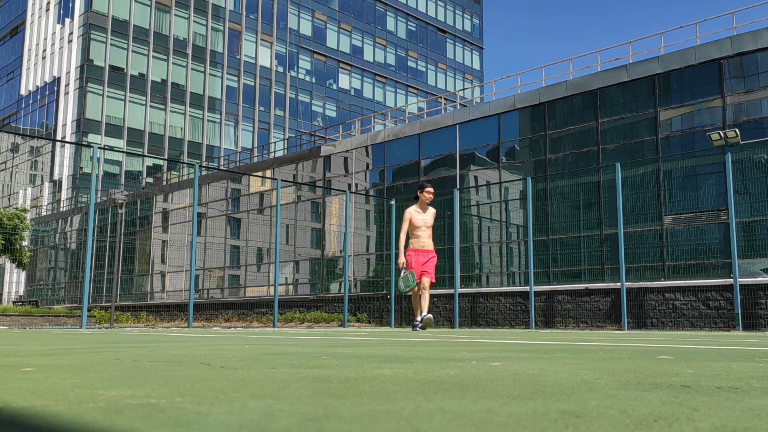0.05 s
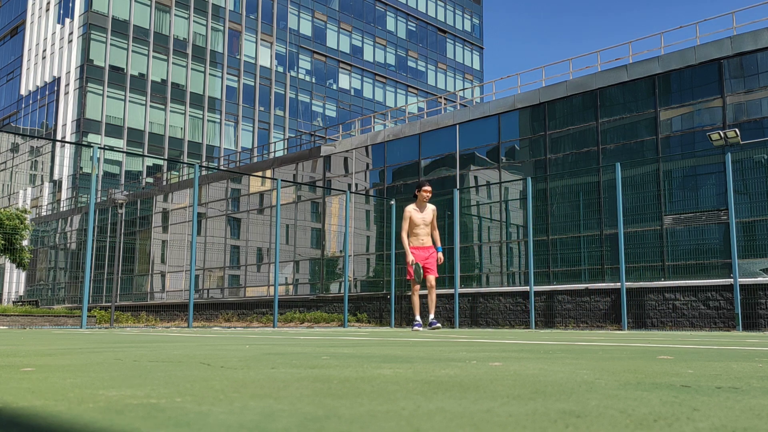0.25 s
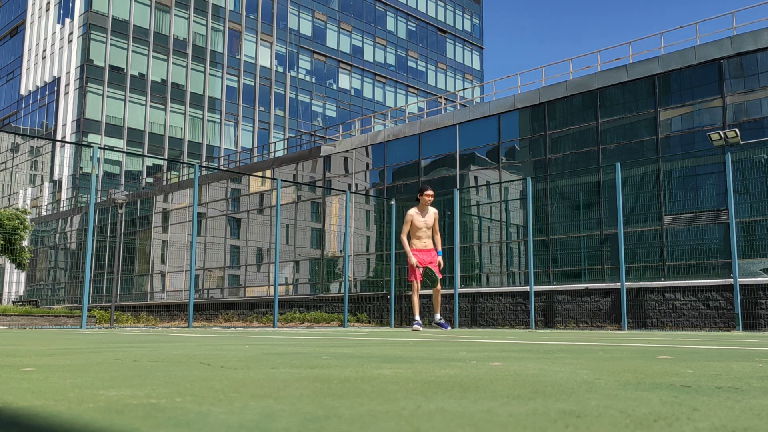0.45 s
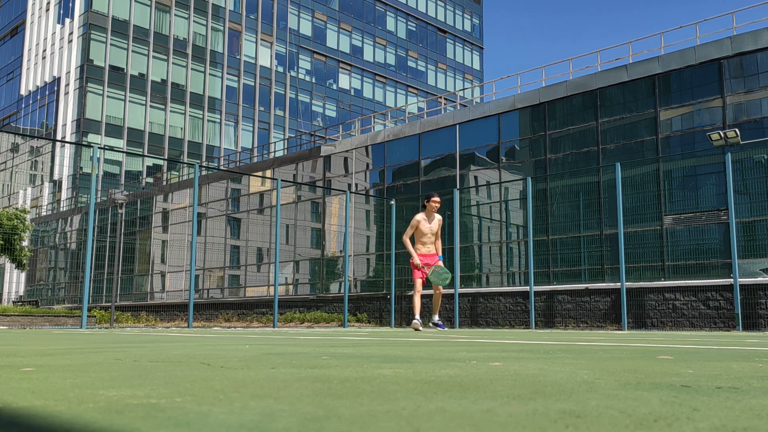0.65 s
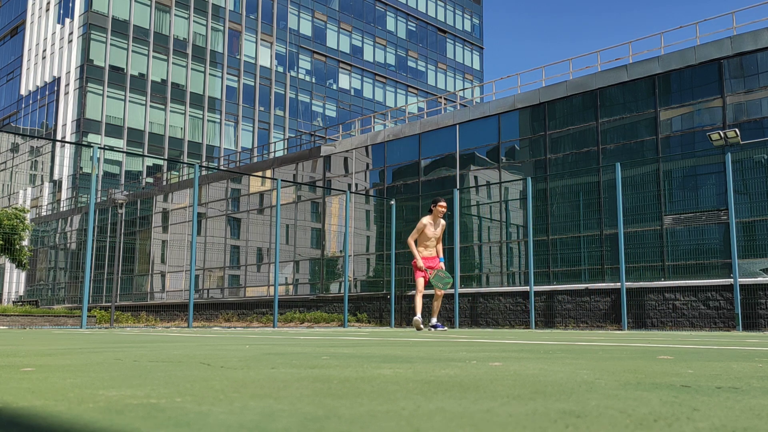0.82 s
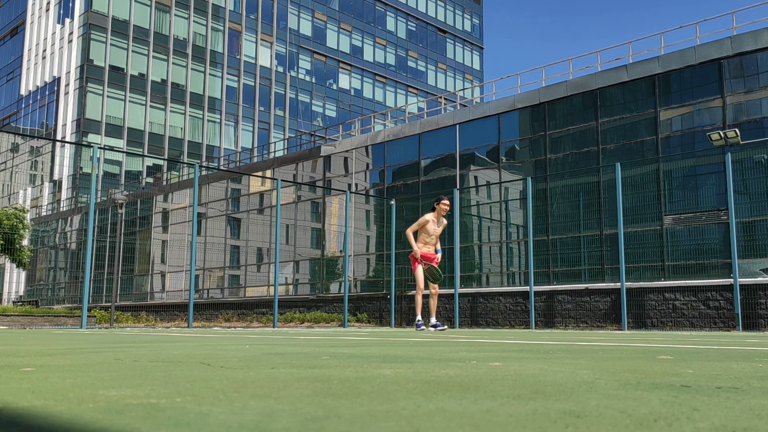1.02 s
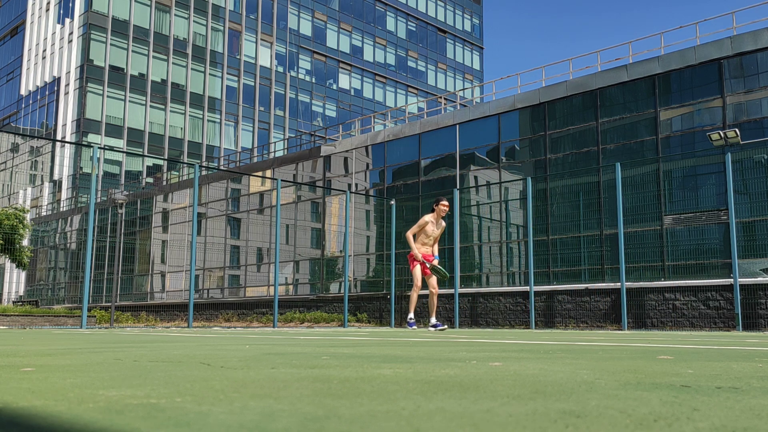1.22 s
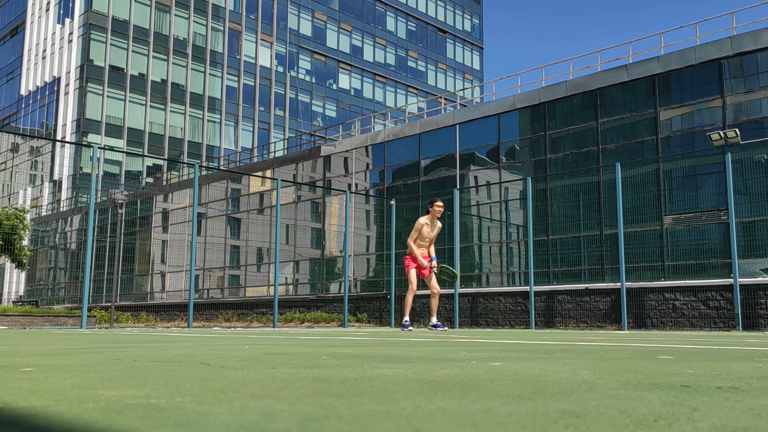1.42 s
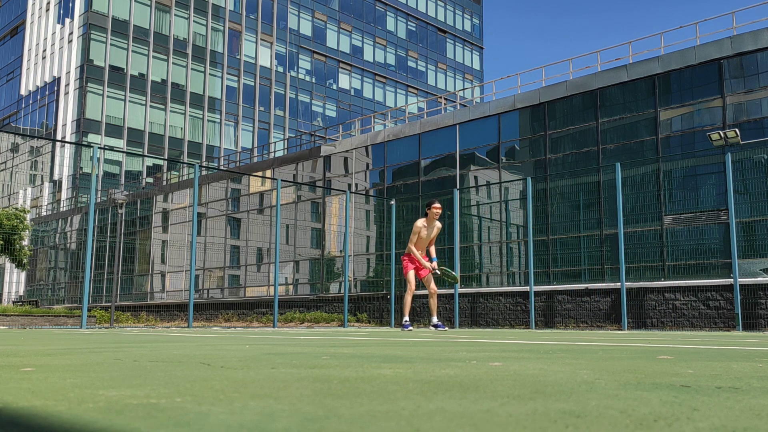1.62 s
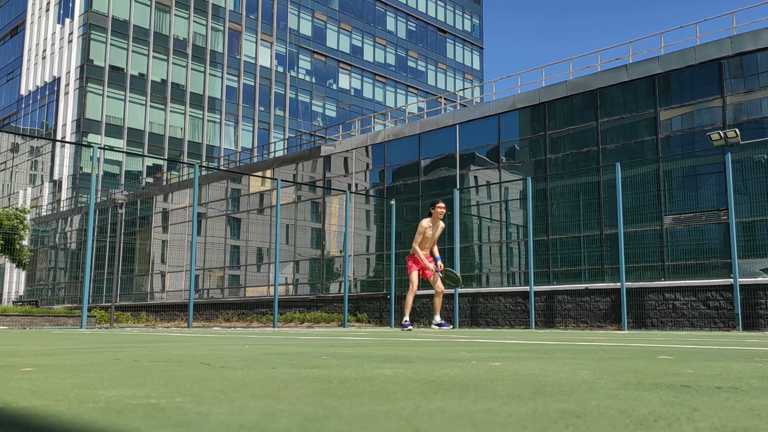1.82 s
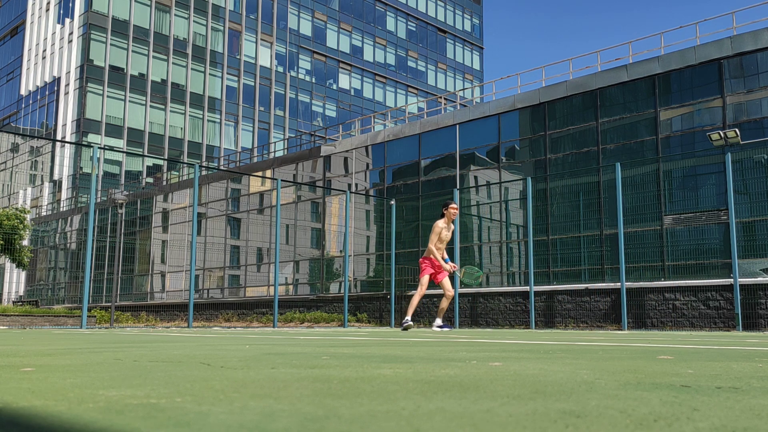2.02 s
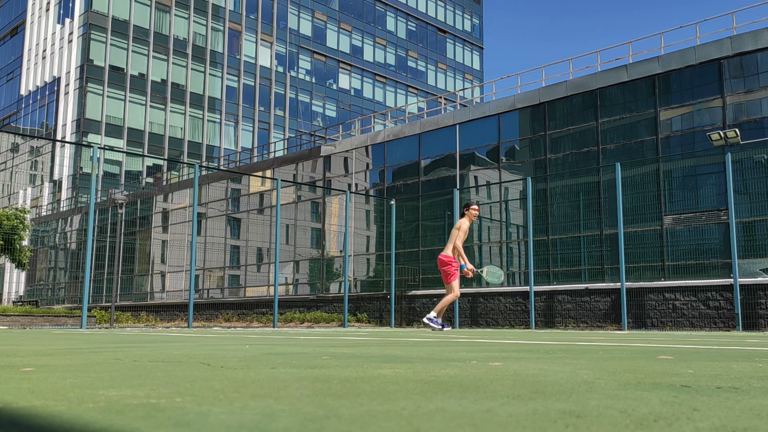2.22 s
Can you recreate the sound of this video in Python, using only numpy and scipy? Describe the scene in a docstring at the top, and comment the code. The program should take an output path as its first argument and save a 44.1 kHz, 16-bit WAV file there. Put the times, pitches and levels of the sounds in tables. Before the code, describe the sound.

One sharp paddle strike on a ball echoes across an outdoor court, with low wind rumble.

```python
"""A paddle game on a fenced outdoor court, heard from ground level through two microphone ports.
Traffic and machinery hum throughout, while wind buffets the ports in turn and soles brush the court.
From 0.9 s small ticks sound close by, and a distant stroke arrives as a soft splash of echoes.
Near 1.3 s an eddy flutters across the left port. At 1.6 s the ball cracks and rings close by,
and the walls answer with slaps, two hollow thuds and a grainy wash that dies into the traffic."""
import sys
import numpy as np
from scipy import signal
from scipy.fft import rfft, irfft
from scipy.io import wavfile
from scipy.ndimage import uniform_filter1d

SR = 44100
rng = np.random.default_rng(int(sys.argv[2]) if len(sys.argv) > 2 else 0)


def unload_audio(sound):
    """Save the sound as a 16-bit wav file, at the path given as the first command line argument."""
    columns = np.transpose(np.atleast_2d(sound))
    # keep every value between -1 and 1, then stretch to whole-number steps
    steps = np.round(np.clip(columns, -1, 1) * 32767)
    wavfile.write(sys.argv[1], SR, steps.astype(np.int16))


N = 103635
T = np.arange(N) / SR
HZ = np.fft.rfftfreq(N, 1 / SR)
IMPULSE = 1. * (T == 0)


def amp(db):
    """Decibels to gain."""
    return 10 ** (np.asarray(db) / 20)


def panned(db, pan_db):
    """Gains for the two ports, the left pan_db above the right."""
    return amp([[db + pan_db / 2], [db - pan_db / 2]])


def unit(x):
    """Scales to rms 1."""
    return x / np.sqrt(np.mean(x ** 2) + 1e-20)


def read(points, hz):
    """Reads a curve on a log-frequency axis."""
    f, value = np.transpose(points)
    return np.interp(np.log(hz + 1), np.log(f + 1), value)


def add(mix, s, sound):
    """Mixes a sound in at time s."""
    part = mix[..., round(s * SR):][..., :sound.shape[-1]]
    part += sound[..., :part.shape[-1]]


def noise(db, channels=2):
    """Noise with a given density (dB per Hz)."""
    return irfft(rfft(rng.standard_normal((channels, N))) * amp(db), N) * np.sqrt(SR / 2)


def colour(x, points, tilt=0, size=2048):
    """Minimum-phase EQ; tilt (dB per octave) tips the treble around 3 kHz."""
    hz = np.fft.rfftfreq(size, 1 / SR)
    octaves = np.log2(np.maximum(hz, 1000) / 3000)
    log_gain = np.log(amp(read(points, hz) + tilt * octaves))
    mirrored = np.concatenate([log_gain, log_gain[-2:0:-1]])
    taps = np.fft.ifft(np.exp(np.conj(signal.hilbert(mirrored)))).real
    return signal.fftconvolve(x, taps[None] if x.ndim > 1 else taps)[..., :x.shape[-1]]


def burst(t60, swell=0):
    """Dense reflections of energy 1 at each port, swelling and then dying."""
    attack = np.minimum((T + 1 / SR) / (swell + 1 / SR), 1)
    decay = amp(-60 * np.maximum(T - swell, 0) / t60)
    x = rng.standard_normal((2, N)) * attack * decay
    return x / np.linalg.norm(x, axis=1, keepdims=True)


# Bed of traffic and air (frequency [Hz], density [dB per Hz])
TRAFFIC_SPECTRUM = [(20, -56.5), (120, -72.5), (300, -77.5), (400, -81), (700, -82.5), (1150, -83.5),
                    (1600, -92.5), (2500, -99), (4000, -110), (6000, -116), (9500, -122), (13000, -117),
                    (16000, -118)]
# Stereo image of the bed (frequency [Hz], correlation of the ports [-1..1])
TRAFFIC_IMAGE = [(50, 0.88), (250, 0.84), (600, 0.26), (1100, -0.24), (2000, 0.084), (8000, -0.24)]
# Slow swell of the traffic (time [s], level [dB])
TRAFFIC_SWELL = [(0, 0), (.5, -1), (.9, -.5), (1.25, 0.8), (1.8, 0), (2.35, 0.9)]
# Machinery tones (frequency [Hz], width [Hz], level [dB])
HUM_TONES = [(249.5, 10, -61.5), (315.3, 36, -59), (500.2, 6, -68), (1240, 2.1, -70)]


def city(pan_db=0.2):
    """Far traffic, centred in the bass and wide above, with the faint hum of building machinery."""
    left, unrelated = rfft(noise(read(TRAFFIC_SPECTRUM, HZ)))
    correlation = read(TRAFFIC_IMAGE, HZ)
    right = correlation * left + np.sqrt(1 - correlation ** 2) * unrelated
    roar = irfft(np.array([left, right]), N)
    swell = amp(np.interp(T, *np.transpose(TRAFFIC_SWELL)))
    hum = 0
    for hz, width, db in HUM_TONES:
        peak_db = -20 * np.log10(1 + (2 * (HZ - hz) / width) ** 2)
        hum += amp(db) * unit(noise(peak_db, channels=1))
    return roar * swell * panned(0, pan_db) + hum


# Wind rumble (frequency [Hz], relative level [dB])
WIND_SPECTRUM = [(8, 1.5), (30, 4), (80, -1.5), (150, -9.5), (300, -32), (600, -43.5), (1500, -79)]
# Gust envelope at each port (time [s], level [dB])
GUSTS_LEFT = [(0, -70), (.27, -39.5), (.42, -45.5), (.68, -56), (.8, -40), (.98, -47), (1.12, -26),
              (1.22, -32.5), (1.35, -26), (1.44, -48.5), (1.52, -33.5), (1.7, -52), (1.9, -53), (2.35, -45)]
GUSTS_RIGHT = [(0, -42.5), (.14, -39.5), (.32, -31.5), (0.531, -38.5), (.6, -29.5), (.8, -28.5),
               (1.06, -26), (1.198, -41), (1.38, -31), (1.52, -49.5), (1.62, -42), (1.69, -31), (1.83, -28),
               (1.922, -54), (2.062, -33), (2.15, -52), (2.35, -47)]


def wind(skew=0.3):
    """Lopsided turbulence, unrelated at the two ports."""
    flow = unit(noise(read(WIND_SPECTRUM, HZ)))
    lopsided = unit(flow + skew * (np.sqrt(1 + flow ** 2) - np.sqrt(2)))
    return lopsided * amp([np.interp(T, *np.transpose(port)) for port in (GUSTS_LEFT, GUSTS_RIGHT)])


# Single wind pops (time [s], bump level [dB], half width [s], port [0 left, 1 right])
WIND_POPS = [(.21, -17, 0.0022, 1), (0.368, -17, 0.0079, 1), (.6, -19, 0.0054, 1), (.589, -27, 0.00097, 1),
             (0.668, -21.5, 0.0018, 1), (0.674, -16, 0.0027, 1), (0.7258, -14, 0.0025, 1),
             (0.7574, -11.5, 0.0061, 1), (0.818, -14, 0.0018, 1), (.834, -14.5, 0.0013, 1),
             (0.861, -11, 0.0024, 1), (0.9065, -10.5, 0.0013, 1), (.936, -22.5, 0.0011, 1),
             (.987, -22.5, 0.0013, 1), (1.0, -24, 0.0019, 1), (1.047, -22.5, 0.00152, 1),
             (1.055, -23.5, .001, 1), (1.064, -17, 0.0016, 1), (1.514, -20, 0.0022, 0),
             (1.715, -18.5, 0.002, 1), (1.816, -19.5, 0.0026, 1), (1.833, -26, 0.0012, 1),
             (2.06, -20.5, 0.0041, 1)]


def buffets(suction=0.26, spread=3.3, front=0.75):
    """Each buffet is a steep-fronted pressure bump inside a wider suction, on one port only."""
    out = np.zeros((2, N))
    for s, db, half, port in WIND_POPS:
        u = (T - s) / half
        bump = np.exp(-np.where(u < 0, u / front, u) ** 2)
        out[int(port)] += amp(db) * (bump - suction * np.exp(-(u / spread) ** 2))
    return out


def eddy(peak_s=1.3165, peak_hz=64.2, octaves_per_s=24.9, flutter_db=-11.5, churn_db=-24, churn_hz=220):
    """A strong eddy flutters faster and faster across the left port and breaks into churning air."""
    t = np.clip(T - peak_s, -.15, .15)
    turns = peak_hz * (2 ** (octaves_per_s * t) - 1) / (octaves_per_s * np.log(2))
    flutter = np.cos(2 * np.pi * turns) + 0.27 * np.cos(4 * np.pi * turns)  # the octave sharpens crests
    flutter *= np.exp(-(t / np.where(t < 0, 0.02, 0.028)) ** 2)  # quick build, slower fade
    churn = unit(noise(-20 * np.log10(1 + (HZ / churn_hz) ** 4), channels=1))[0]
    churn *= np.exp(-((t - 0.012) / 0.013) ** 2)  # crests 12 ms after the flutter
    return np.array([amp(flutter_db) * flutter + amp(churn_db) * churn, np.zeros(N)])


# Shoe scuff cues (centre time [s], half length [s], gain [dB], left over right [dB])
SCUFF_CUES = [(.293, 0.015, 0.5, 2), (0.66, 0.072, 3.5, 4), (1.157, 0.018, 2, 0), (1.3, .04, -2.5, -1),
              (2.218, 0.007, 2.5, 0), (2.322, .06, 1.5, -1)]
# Hiss of a sole (frequency [Hz], density [dB per Hz])
SCUFF_SPECTRUM = [(1500, -118), (4000, -112), (7000, -115), (10000, -123), (15000, -122)]


def scuffs():
    """Soles brush the court in faint swells of hiss."""
    envelope = sum(panned(db, pan) * np.exp(-.5 * ((T - s) / half) ** 2)
                   for s, half, db, pan in SCUFF_CUES)
    return noise(read(SCUFF_SPECTRUM, HZ)) * envelope


# Tick cues (time [s], gain [dB], left over right [dB])
TICK_CUES = [(0.9048, 4, 1), (0.975, -2.5, 2), (1.0672, -3, 0.5), (1.1546, -8.5, 2), (2.214, -17.5, -8)]
# Thin, bright tone of a tick (frequency [Hz], gain [dB])
TICK_EQ = [(1000, -41), (2400, -39), (3300, -26), (4400, -31), (5400, -26), (7000, -26), (9500, -38),
           (13500, -31), (16000, -35)]


def ticks(t60=0.021):
    """Tiny dry clicks close to the microphone, equal parts spike and noisy tail."""
    out = np.zeros((2, N))
    for s, db, pan in TICK_CUES:
        click = (IMPULSE + burst(t60)) / np.sqrt(2)
        add(out, s, colour(click, TICK_EQ) * panned(db, pan))
    return out


# Tone of the distant stroke (frequency [Hz], gain [dB])
FAR_EQ = [(300, -12.5), (1200, -19.5), (2200, -12), (3200, -13), (5000, -21), (7500, -23.5), (10000, -33.5),
          (16000, -36.5)]


def far_stroke(start_s=0.97, swell_s=0.027, splash_t60=0.27, linger_t60=0.97, linger_db=-7):
    """A stroke at the far end, heard through its reflections: a splash and a lingering tail."""
    reflections = burst(splash_t60, swell_s) + amp(linger_db) * burst(linger_t60, swell_s)
    out = np.zeros((2, N))
    add(out, start_s, colour(reflections, FAR_EQ))
    return out


# Tone of the court's reverb (frequency [Hz], gain [dB])
WASH_EQ = [(200, -5.5), (700, -6), (1500, -14.5), (3300, -16), (7500, -20), (11000, -30), (16000, -30)]
# Its decay, shorter in the treble (frequency [Hz], t60 [s])
WASH_DECAY = [(200, 0.89), (2500, 0.75), (7000, 0.49), (15000, 0.39)]


def court_wash(hit_s, pan_db=1, build_s=0.07, grain_db=2):
    """The court returns the close hit as a grainy wash that builds and dies."""
    grains = amp(grain_db * unit(uniform_filter1d(rng.standard_normal(N), size=90)))
    hz, t, bands = signal.stft(rng.standard_normal((2, N)) * grains, SR, nperseg=256)
    decay = amp(-60 * t / read(WASH_DECAY, hz)[:, None])
    tail = signal.istft(bands * decay, SR)[1][:, :N]
    tail *= 1 - .5 * np.exp(-T / build_s)
    tail /= np.linalg.norm(tail[0])
    out = np.zeros((2, N))
    add(out, hit_s, colour(tail, WASH_EQ) * panned(0, pan_db))
    return out


# Slapback off the walls (time [s], gain [dB], t60 [s], treble tilt [dB per octave])
SLAP_CUES = [(1.6115, -20, .012, 7), (1.6255, -20, 0.01, 5), (1.6395, -28, .01, 11), (1.6502, -7, 0.02, -1),
             (1.6638, 1, 0.027, 0.5), (1.688, -24, 0.01, 9), (1.751, -19, 0.04, 0)]
# Tone of a slap (frequency [Hz], gain [dB])
SLAP_EQ = [(100, -1), (250, 4), (600, 3), (1000, -6.5), (1500, -23.5), (2400, -11), (3100, -7.5),
           (4500, -19), (5600, -17), (8000, -30), (15000, -44)]


def wall_slaps(pan_db=2, smear=1.3, ring_db=-7):
    """The walls return the close hit as separate smeared slaps that carry the ring of the ball."""
    slaps = np.zeros((2, N))
    for s, db, t60, tilt in SLAP_CUES:
        slap = (smear * burst(t60) - IMPULSE) / np.hypot(1, smear)
        add(slaps, s, colour(slap, SLAP_EQ, tilt) * panned(db, pan_db))
    ringing = signal.fftconvolve(slaps, ball_ring()[None])[:, :N]
    return slaps - amp(ring_db) * ringing


# Thuds under the strongest slaps (time [s], gain [dB])
THUD_CUES = [(1.6503, -2.5), (1.6636, -9)]
# Hollow tone of a thud (frequency [Hz], gain [dB])
THUD_EQ = [(60, -2), (200, 8), (500, 3.5), (850, -3), (1500, -26), (4000, -50)]


def wall_thuds():
    """The bass of the hit comes back unscattered in the two strongest reflections."""
    out = np.zeros((2, N))
    for s, db in THUD_CUES:
        add(out, s, -amp(db) * colour(IMPULSE, THUD_EQ))
    return out


# Modes of the ball (frequency [Hz], level [dB], t60 [s])
BALL_MODES = [(253, -34, 0.019), (590, -35.5, 0.031), (1042, -27, 0.052), (2095, -29, 0.024),
              (2466, -33.5, 0.017), (2970, -38, 0.024), (3324, -36, 0.036), (3540, -32.5, 0.034),
              (4080, -31, 0.028), (5520, -35.5, 0.021), (6370, -33, 0.023), (6900, -30.5, 0.023),
              (7330, -35, 0.034)]


def ball_ring():
    """The struck ball rings briefly in damped sine modes."""
    return sum(amp(db - 60 * T / t60) * np.sin(2 * np.pi * hz * T) for hz, db, t60 in BALL_MODES)


# Punch of the pressure front (frequency [Hz], gain [dB])
FRONT_EQ = [(60, -7), (250, 14), (600, 12), (1300, -0.5), (1800, -6), (2400, -7.5), (4000, -3), (5000, -13),
            (7500, -3.5), (10000, -14), (13000, -12), (16000, -14)]
# Brittle crack of contact (frequency [Hz], gain [dB])
CRACK_EQ = [(1500, -24), (3500, -8), (5000, -15), (7500, -6), (10000, -15), (13000, -13), (16000, -16)]
# Scatter off the ground and the microphone's housing (frequency [Hz], gain [dB])
SCATTER_EQ = [(150, -10), (600, -11), (1500, -15), (3500, -5), (5000, -10), (7500, -6), (11000, -11),
              (16000, -22)]
# Shading of the right port against the left (frequency [Hz], gain [dB])
SHADOW_EQ = [(200, 0), (700, 0), (1100, -4), (2100, 2), (3500, -6.5), (7000, -6), (10000, -8), (14000, -14)]


def close_hit(hit_s, right_lag_s=.00036, crack_t60=.008, scatter_t60=0.023):
    """Paddle meets ball: a sharp front, a crack and a ring; the right port is later and shaded."""
    front = -colour(IMPULSE, FRONT_EQ)
    crack = colour(burst(crack_t60)[0], CRACK_EQ)
    scatter = colour(burst(scatter_t60), SCATTER_EQ)
    left, right = front + crack + ball_ring() + scatter
    out = np.zeros((2, N))
    add(out[0], hit_s, left)
    add(out[1], hit_s + right_lag_s, colour(right, SHADOW_EQ))
    return out


def scene(hit_s=1.5939):
    """The game over a bed of city and wind."""
    stroke = close_hit(hit_s) + court_wash(hit_s) + wall_slaps() + wall_thuds()
    return stroke + far_stroke() + ticks() + scuffs() + city() + wind() + buffets() + eddy()


def record(dry):
    """A steep linear-phase high cut at 16.3 kHz."""
    taps = signal.firwin(301, 16300, window=("kaiser", 9), fs=SR)
    edge = len(taps) // 2
    padded = np.pad(dry, ((0, 0), (edge, edge)), "edge")
    return signal.oaconvolve(padded, taps[None], "valid")


dry = scene()
out = record(dry)
unload_audio(out)
```